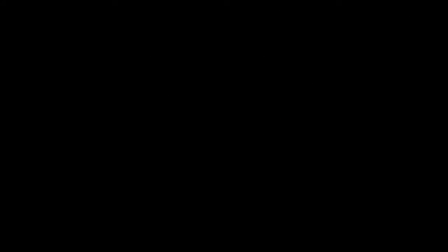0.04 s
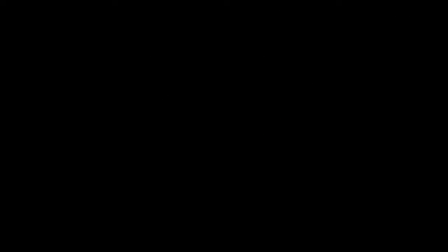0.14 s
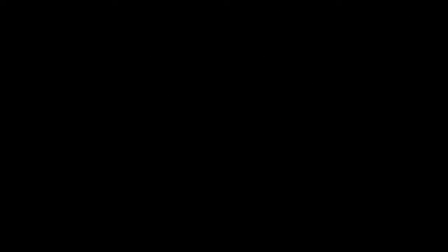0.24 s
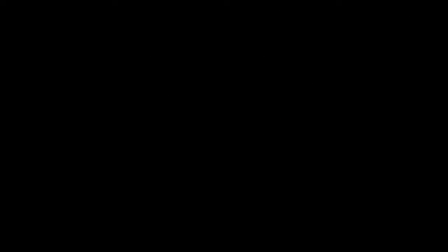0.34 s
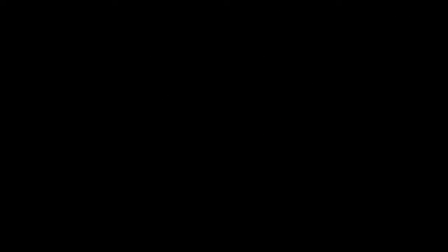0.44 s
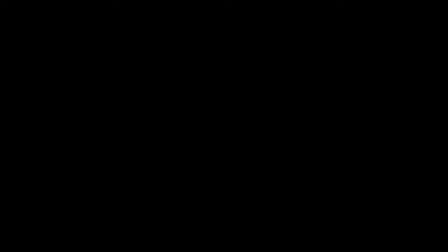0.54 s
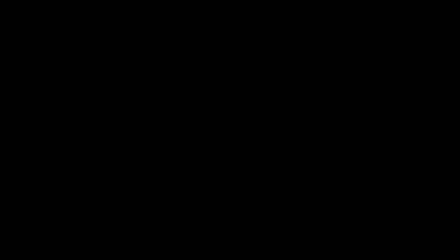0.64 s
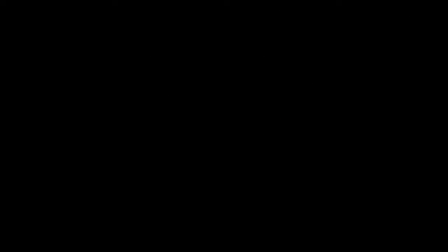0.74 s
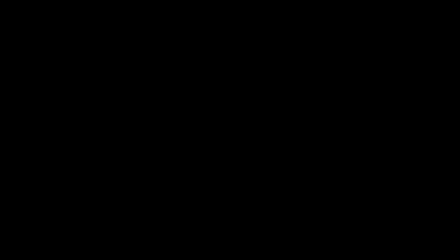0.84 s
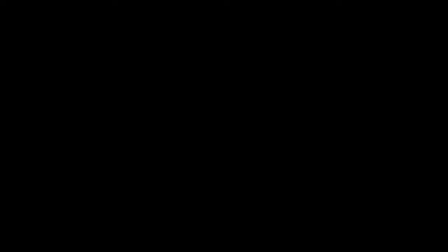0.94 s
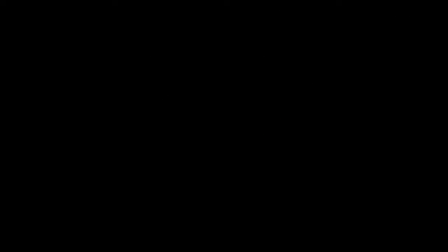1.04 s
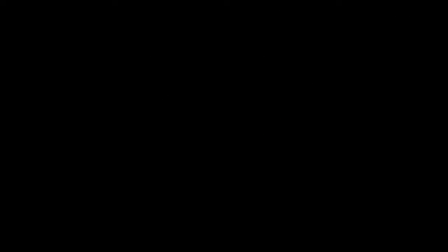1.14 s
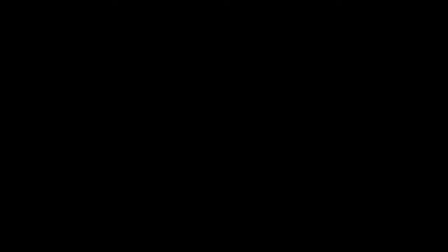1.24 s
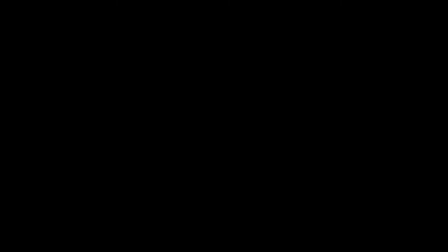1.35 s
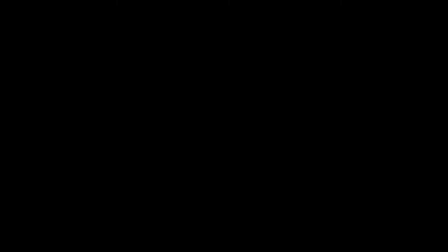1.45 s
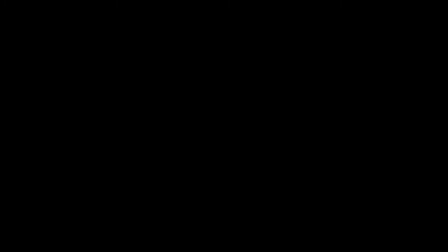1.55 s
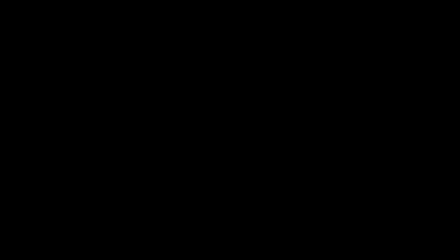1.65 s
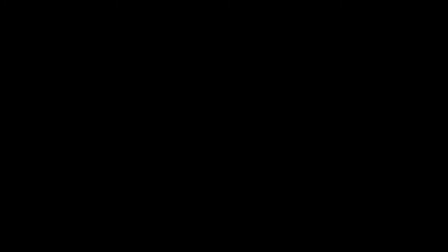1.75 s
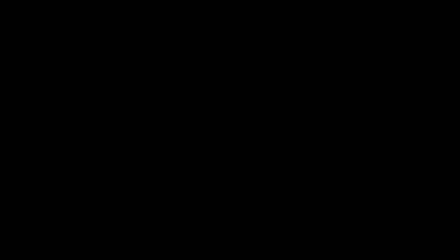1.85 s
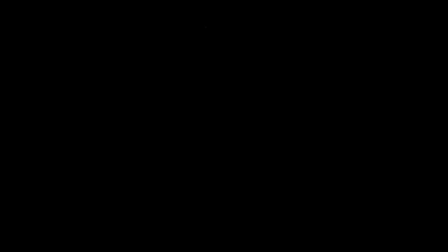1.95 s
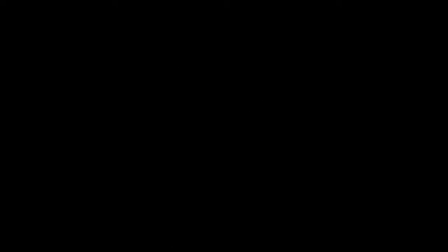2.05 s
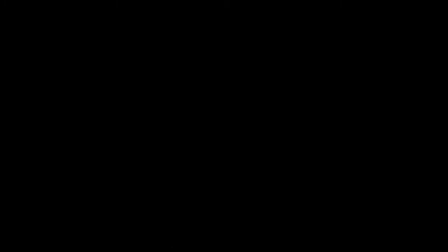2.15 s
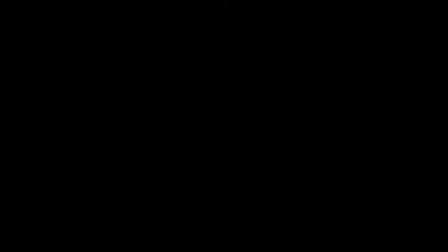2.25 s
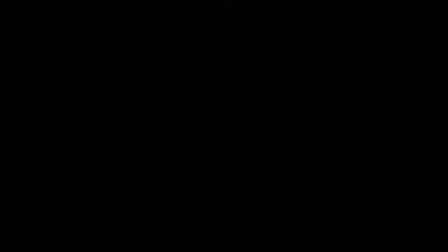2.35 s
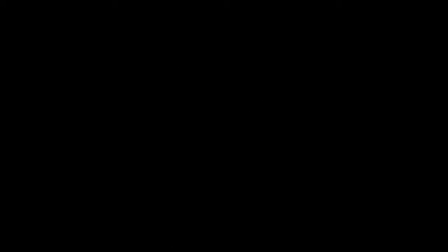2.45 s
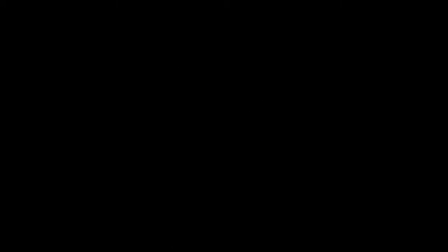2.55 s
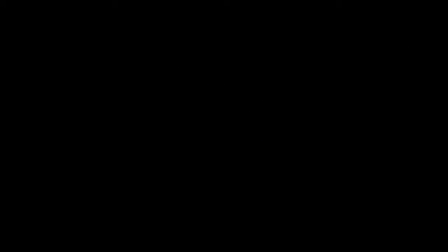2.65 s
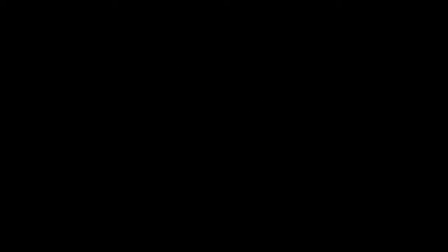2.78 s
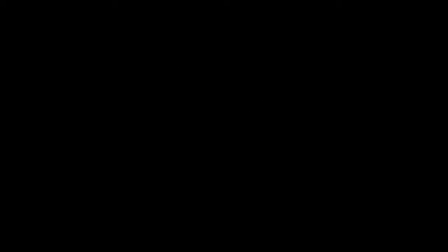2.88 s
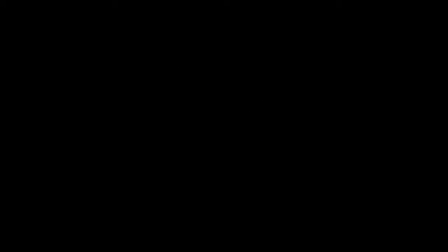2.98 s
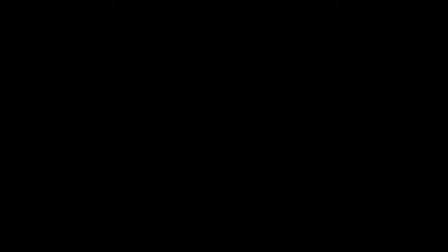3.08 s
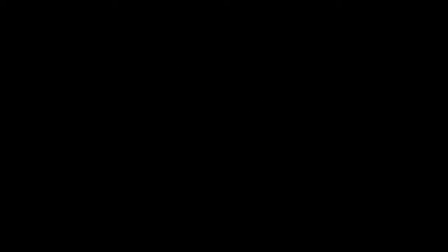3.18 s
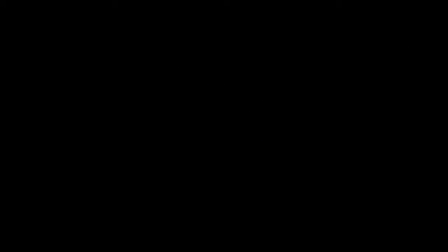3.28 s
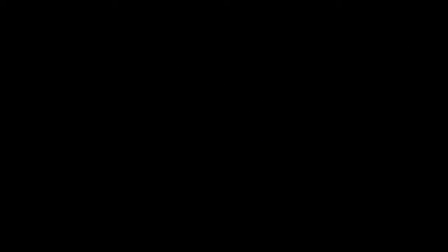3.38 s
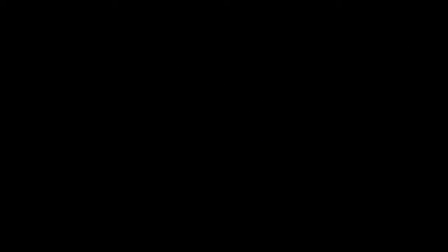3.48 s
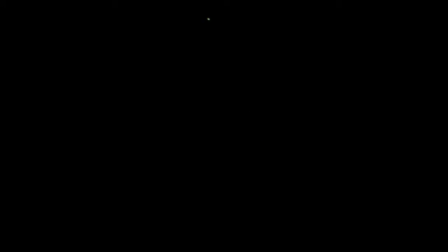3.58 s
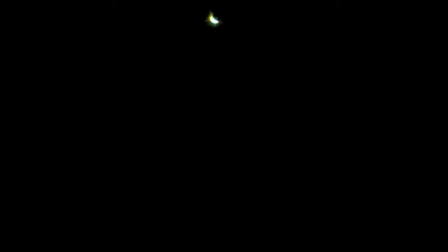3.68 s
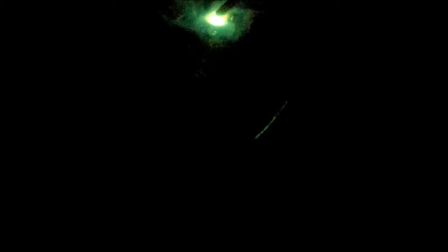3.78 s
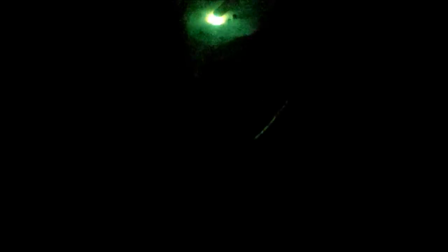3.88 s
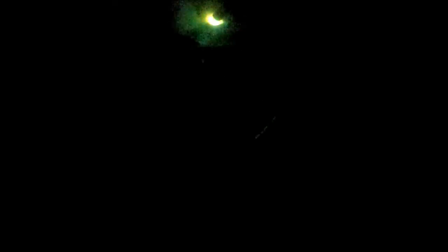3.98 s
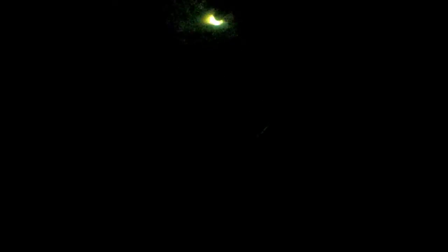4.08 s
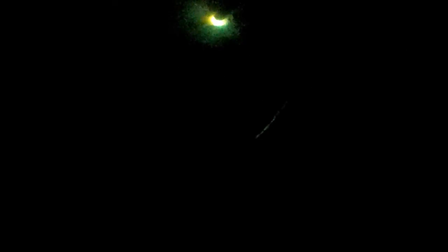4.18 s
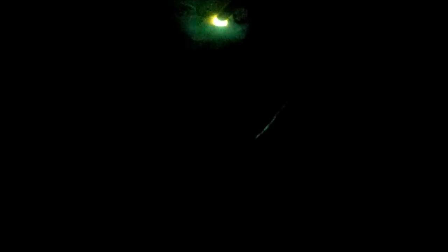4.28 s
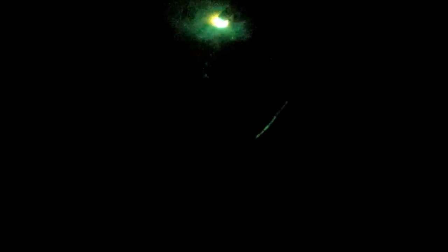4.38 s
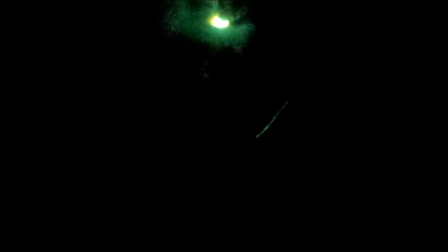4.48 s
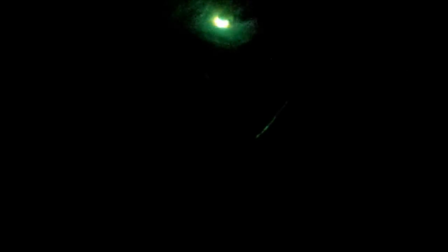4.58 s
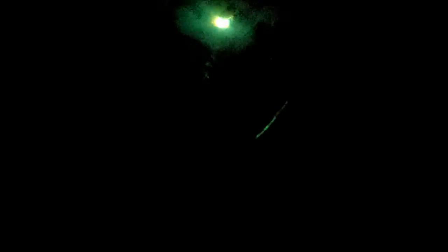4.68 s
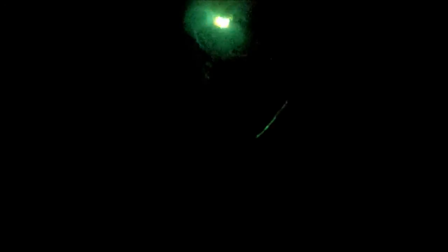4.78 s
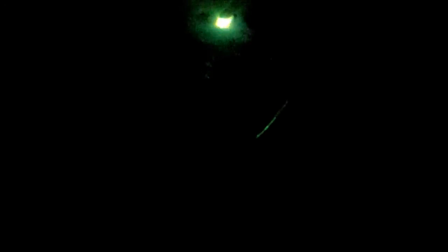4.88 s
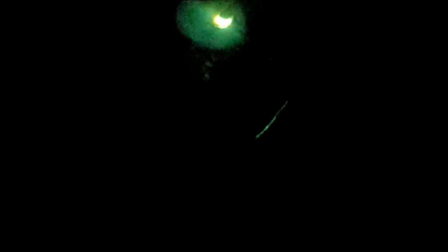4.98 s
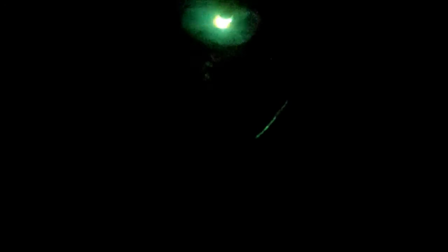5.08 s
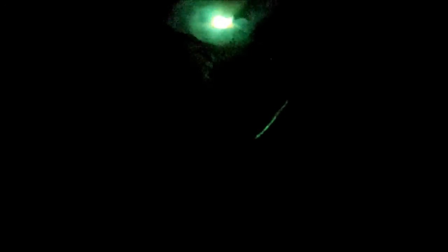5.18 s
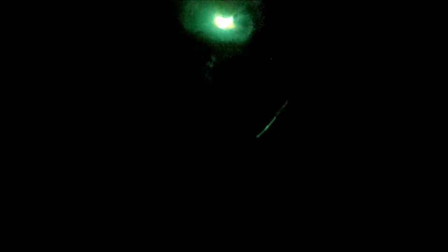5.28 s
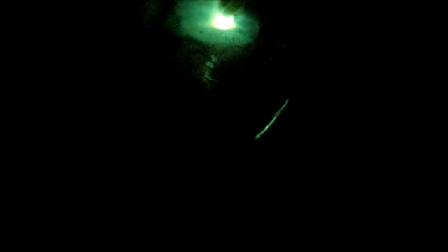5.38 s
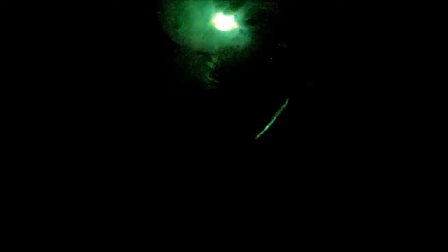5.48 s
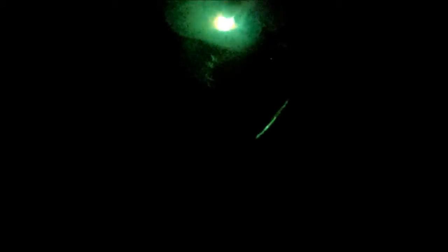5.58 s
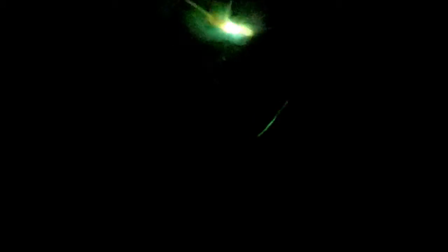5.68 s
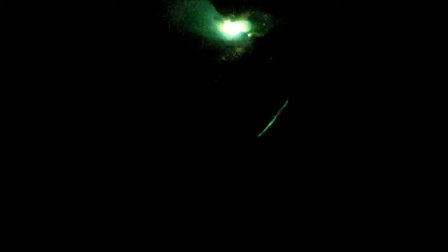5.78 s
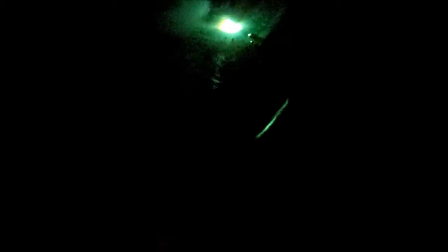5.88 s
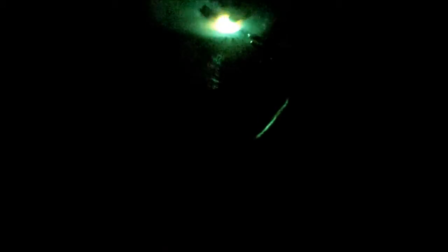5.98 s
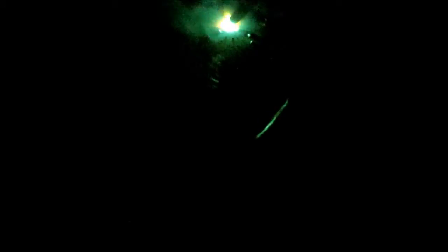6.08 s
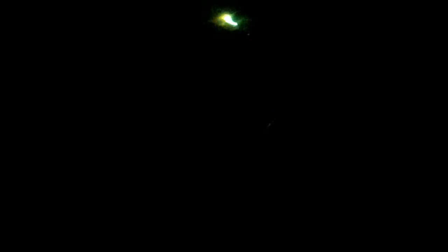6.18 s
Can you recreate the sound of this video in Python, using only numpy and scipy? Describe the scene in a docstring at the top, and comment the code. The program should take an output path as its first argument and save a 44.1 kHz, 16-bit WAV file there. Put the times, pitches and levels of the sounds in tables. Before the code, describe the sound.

Stick welding heard from close by in a slightly reverberant workshop. At first there is only the low, airy hum of the welder's fan, broken by a light knock and a short sputter as the rod fails to strike. A little past halfway the arc ignites, much louder than the hum, and sizzles and crackles to the end while drops of molten metal burst with sharp pops.

```python
"""Stick welding in a workshop. The fan of the welding machine hums from the start.
The rod knocks and scratches on the work and spits briefly, with a dull puff of gas.
Then the arc catches and burns to the end: a low roar of gas, a crackle of countless sparks,
and a sharp pop whenever a bridge of molten metal bursts. Fixed resonances near the microphone
colour the sparks and pops, and the walls answer with a short reverberation."""
import sys
import numpy as np
from scipy import signal
from scipy.fft import rfft, irfft
from scipy.io import wavfile
from scipy.ndimage import uniform_filter1d

SR = 44100
rng = np.random.default_rng(int(sys.argv[2]) if len(sys.argv) > 2 else 0)


def bounce(signal):
    """Save signal as a 16-bit WAV file at the path given by the first command-line argument."""
    frames = np.transpose(np.atleast_2d(signal))
    limited = np.clip(frames, -1, 1)
    pcm = np.round(limited * 32767).astype(np.int16)
    wavfile.write(sys.argv[1], SR, pcm)


N = 274743
TIME = np.arange(N) / SR

# Broad spectrum of a spark. Each row: frequency in Hz, relative level in dB.
SPARK_SPECTRUM = [(40, -45.5), (110, -25.5), (250, -25), (650, -20.5), (900, -33), (1400, -23), (2300, -27),
                  (3600, -37), (4200, -46), (5400, -32.5), (8000, -40.5), (12000, -33), (15200, -44),
                  (17000, -56.5)]
# Fixed resonances near the microphone, likely camera housing or helmet, that colour the sparks
# and pops. Each row: frequency in Hz, width in Hz, relative level in dB.
NEAR_MODES = [(427, 57, -7.3), (1700, 105, -13.0), (1880, 48, -15.9), (2543, 50, -14.6), (2741, 81, -10.9),
              (3102, 110, -12.7), (3681, 338, -23.1), (4412, 90, -20.1), (4586, 37, -17.1),
              (4923, 92, -19.0), (5979, 94, -12.5), (6356, 148, -24.0), (6921, 115, -22.6),
              (7372, 122, -19.2), (7920, 172, -25.1), (8082, 116, -22.1), (8479, 42, -25.9),
              (8745, 60, -27.3), (9629, 112, -25.4), (9954, 110, -26.0), (10323, 80, -25.6),
              (11000, 155, -27.6), (12161, 58, -26.9), (12479, 87, -25.6), (12859, 73, -24.2),
              (13695, 91, -23.9), (13964, 262, -27.7), (15094, 229, -29.9)]
# How hard the arc burns, from ignition on. Each row: time in seconds, relative level in dB.
BURN = [(3.711, 1.5), (3.84, -3), (4.08, 4.5), (4.2, -1), (4.255, -4.5), (4.3, 1.5), (4.42, -.5),
        (5.2, -1.15), (5.48, 0.4), (5.75, -2.5), (6.12, 2.5), (6.23, -4)]
# The arc brightens, dulls as it settles, and brightens again.
# Each row: time in seconds, spectral tilt in dB per octave.
BRIGHTNESS = [(3.75, -0.1), (4.3, 2), (4.6, 2.5), (5.62, -2.66), (6.2, .3)]
# Drops of metal bridge the gap and burst. Each row: time in seconds, relative strength in dB,
# base decay time in seconds, change in the arc's level just before the burst in dB.
DROPS = [(3.72, -11, 0.0023, 0), (3.7316, -12, 0.0017, -7), (3.7702, -10.5, .0016, 3),
         (3.8763, -4.5, 0.00069, 5.5), (3.9942, -9.5, 0.0014, -24), (4.0544, -4.5, 0.00092, -4),
         (4.1164, -14.5, 0.001, -9), (4.1884, -10.5, .0012, 0), (4.3089, -17, 0.00069, 2),
         (4.3599, -12.5, 0.0013, 1), (4.5048, -15.5, 0.0015, 1), (4.6568, -14, .0009, 3),
         (4.8492, -19, 0.00092, -3.5), (4.926, -18.5, .0012, -2.5), (4.9839, -3, 0.0018, -1),
         (5.2295, -13, 0.0017, -1), (5.325, -6.5, 0.0013, -4), (5.344, -8, 0.0022, 4),
         (5.4903, -13.5, 0.0031, 2.5), (5.5074, -15, 0.0018, 2.5), (5.5828, -13, 0.0025, -3),
         (5.62, -14.5, 0.0019, 2), (5.6848, -16.5, .0011, 1.5), (5.7082, -11.5, 0.0011, -2),
         (5.7896, -16.5, 0.0015, 1), (6.1071, -7.5, 0.00073, 1), (6.1114, -10.5, .00097, -1),
         (6.163, -14, 0.0028, -2), (6.2259, -12.5, .0014, -8)]


def gain_of(db):
    """Amplitude ratio of a level in decibels."""
    return 10 ** (np.asarray(db) / 20)


def unit_rms(x):
    """Normalisation to an rms of 1."""
    return x / np.sqrt(np.mean(x ** 2) + 1e-20)


def at(curve, s):
    """Linear interpolation of a control curve in time."""
    return np.interp(s, *np.transpose(curve))


def at_frequency(points, hz):
    """Interpolation on a logarithmic frequency axis."""
    f, value = np.transpose(points)
    return np.interp(np.log(hz + 1), np.log(f + 1), value)


def add(mix, s, sound):
    """Superposition: a sound joins the mix at s seconds."""
    part = mix[round(s * SR):][:len(sound)]
    part += sound[:len(part)]


def wander(rate_hz):
    """Slow random modulation: low-passed noise of rms 1."""
    hz = np.fft.rfftfreq(N, 1 / SR)
    return unit_rms(irfft(rfft(rng.standard_normal(N)) / (1 + (hz / rate_hz) ** 4), N))


def band(x, low_hz, high_hz):
    """Complementary band-pass filter: neighbouring bands add up flat."""
    hz = np.fft.rfftfreq(len(x), 1 / SR)
    passband = 1 / (1 + (hz / high_hz) ** 8) - 1 / (1 + (hz / low_hz) ** 8)
    return irfft(rfft(x) * passband, len(x))


def ring(spectrum, modes, tilt_db=0, size=8192):
    """Minimum-phase impulse response, of energy 1, of a broad spectrum with resonances on top."""
    hz = abs(np.fft.fftfreq(size, 1 / SR))
    power = gain_of(at_frequency(spectrum, hz)) ** 2
    power += sum((gain_of(db) / (1 + ((hz - f) / width) ** 2)) ** 2 for f, width, db in modes)
    log_gain = np.log(np.sqrt(power) * gain_of(tilt_db * np.log2(hz + 300)))
    response = np.fft.ifft(np.exp(np.conj(signal.hilbert(log_gain)))).real[:size // 2]
    return response / np.linalg.norm(response)


def fan(shaft_hz=92.77, waver=0.0017, air_db=-33.5, throb_db=1.5):
    """Forced resonance: air noise excites the case, under harmonics of the wavering shaft speed."""
    # Broad spectrum of the airflow. Each row: frequency in Hz, relative level in dB.
    air_spectrum = [(20, -42), (42, -31), (52, -33), (66, -30.5), (145, -43.5), (185, -16.5), (400, -26),
                    (560, -46.5), (880, -34), (1020, -44), (2300, -44), (4000, -53), (6000, -60),
                    (15000, -78)]
    # Resonances of the case. Each row: frequency in Hz, width in Hz, relative level in dB.
    case_modes = [(203, 7.8, -12.5), (249.5, 44.6, -15.5), (331.7, 20, -18.5), (437, 31, -15),
                  (463.2, 30, -12), (489, 41, -21), (580, 22, -28), (643, 47, -29.5), (1693, 144, -35.5),
                  (1857, 90, -35), (2532, 88, -38), (2990, 85, -45), (3258, 44, -36.5), (3687, 98, -42.5),
                  (4550, 50, -47), (4880, 70, -50.3), (5720, 66, -55), (5900, 100, -67)]
    # Low hum. Each row: multiple of the shaft speed, level in dB.
    hum_orders = [(4, -37.5), (5, -48), (8, -60)]
    # High whine. Each row: time in seconds, level in dB.
    whine = [(0, -59), (.3, -52), (1.6, -53), (1.85, -58), (2.4, -53), (3.05, -49), (3.6, -53)]
    air = unit_rms(signal.oaconvolve(rng.standard_normal(N), ring(air_spectrum, case_modes))[:N])
    turns = np.cumsum(shaft_hz * (1 + waver * wander(6.3))) / SR
    orders = hum_orders + [(20, at(whine, TIME))]
    tones = sum(gain_of(db + throb_db * wander(11.6)) * np.sin(2 * np.pi * k * turns)
                for k, db in orders)
    return gain_of(air_db) * air + np.sqrt(2) * tones


def burst(rise_s, decay_s, size=1024):
    """Broadband transient of energy 1: the pressure of a small explosion swells and dies away."""
    t = np.arange(1, size + 1) / SR
    envelope = (1 - np.exp(-t / rise_s)) * np.exp(-t / decay_s)
    wave = rng.standard_normal(size) * envelope
    for _ in range(6):
        wave = irfft(np.exp(1j * np.angle(rfft(wave))))  # flatten the spectrum
        wave *= envelope / np.sqrt(abs(uniform_filter1d(wave ** 2, 20)) + 1e-20)  # restore the envelope
    return wave / np.linalg.norm(wave)


def sparks(per_s, spread_db, hiss, decay_s, emphasis=0.9, kinds=32):
    """Shot noise: tiny explosions at random times, each kind stressing its own band, over hiss."""
    strength = gain_of(spread_db * np.minimum(rng.exponential(1, N), 3))
    clicks = strength * rng.choice([-1, 1], N) * (rng.random(N) < per_s / SR)
    kind = rng.integers(0, kinds, N)
    centres_hz = rng.permutation(np.geomspace(1200, 15000, kinds))
    out = np.zeros(N)
    for k, length_s in enumerate(decay_s * np.geomspace(.4, 2.5, kinds)):
        grain = burst(length_s / 2, length_s, size=256)
        grain += emphasis * band(grain, centres_hz[k] / np.sqrt(2), centres_hz[k] * np.sqrt(2))
        out += signal.oaconvolve(clicks * (kind == k), grain)[:N]
    return unit_rms(unit_rms(out) + hiss * rng.standard_normal(N))


def rod_scratches():
    """Impulse excitation: the dragging rod spits runs of sparks that ring the nearby resonances."""
    # Each row: start in seconds, level in dB, length in seconds, tilt in dB per octave.
    scratches = [(1.623, -35.5, 0.009, 0), (1.98, -35.5, 0.024, -2), (2.018, -36, 0.046, 0),
                 (2.051, -25.5, 0.022, -3.2), (2.684, -45.5, 0.0085, -1.5), (3.627, -37, 0.019, 1.5),
                 (3.657, -35, 0.0043, 3), (3.681, -36, 0.0091, 1.5), (3.699, -34, 0.012, 2)]
    grit = sparks(per_s=7700, spread_db=6.5, hiss=0.99, decay_s=0.0002)
    out = np.zeros(N)
    for s, db, length_s, tilt_db in scratches:
        run = unit_rms(grit[round(s * SR):round((s + length_s) * SR)])
        add(out, s, gain_of(db) * signal.fftconvolve(run, ring(SPARK_SPECTRUM, NEAR_MODES, tilt_db)))
    return out


def struck(blows, modes):
    """Free vibration: each blow starts damped sines that swell over their first cycle."""
    t = np.arange(8192) / SR
    ringing = sum(gain_of(db - 60 * t / t60) * np.minimum(hz * t, 1) * np.sin(2 * np.pi * hz * t)
                  for hz, db, t60 in modes)
    out = np.zeros(N)
    for s, db in blows:
        add(out, s, gain_of(db) * ringing)
    return out


def rod_knock():
    """Modal ringing after an impact: the rod's tip knocks on the steel."""
    # Each row: time in seconds, strength in dB.
    knocks = [(1.981, -33.5)]
    # Each row: frequency in Hz, relative level in dB, time to fall 60 dB in seconds.
    rod_modes = [(1436, 1.5, 0.06), (1740, -9, 0.13), (2280, -11, 0.33)]
    return struck(knocks, rod_modes)


def gas_puffs():
    """Heavily damped oscillation: gas puffs with a dull ring as a spark flares and dies."""
    # Each row: time in seconds, strength in dB.
    puffs = [(2.0695, -18), (5.709, -38)]
    # Each row: frequency in Hz, relative level in dB, time to fall 60 dB in seconds.
    puff_modes = [(129, 3.8, 0.049), (256, 2.6, 0.043), (463, 3.7, 0.047)]
    return struck(puffs, puff_modes)


def arc(roar_db=-32.0, crackle_db=-28.5, fizz_db=-37, gust_db=1.5, flutter_db=1.84, bridge_s=0.016):
    """Source and filter: gas noise and sparks follow the burn, coloured by the nearby resonances."""
    burn_db = at(BURN, TIME)
    ignition = np.clip((TIME - BURN[0][0]) / 0.0043 + 1, 0, 1)
    # while a drop bridges the gap, the arc chokes or swells
    bridge_db = sum(db * ((TIME > s - bridge_s) & (TIME < s)) for s, _, _, db in DROPS)
    envelope = ignition * gain_of(bridge_db)
    shower = sparks(per_s=1400, spread_db=0, hiss=0.42, decay_s=0.000353)
    shower = unit_rms(shower * gain_of(flutter_db * wander(54)))
    response = ring(SPARK_SPECTRUM, NEAR_MODES)

    def layer(source, level_db):
        """Resonant filtering of one band, scaled to its level."""
        source = source / np.std(signal.oaconvolve(source, response))
        return signal.oaconvolve(source * envelope * gain_of(level_db), response)[:N]

    gas_db = roar_db + 0.6 * burn_db + gust_db * wander(10.5)
    treble_db = 1.3 * at(BRIGHTNESS, TIME)  # the tilt acts over 1.3 octaves
    roar = layer(band(rng.standard_normal(N), 30, 950), gas_db)
    crackle = layer(band(shower, 950, 7000), crackle_db + burn_db)
    fizz = layer(band(shower, 7000, 18000), fizz_db + burn_db + treble_db)
    return roar + crackle + fizz


def pop(s, db, decay_s, rise_s=0.00061, boost_db=18.5, tilt_db=0.54):
    """Impulse response: a bursting drop rings the nearby resonances; weak ones fade more slowly."""
    strongest_db = max(row[1] for row in DROPS)
    stretch = gain_of(0.169 * (strongest_db - db))
    pressure = burst(rise_s * stretch ** 2, decay_s * stretch)
    response = ring(SPARK_SPECTRUM, NEAR_MODES, tilt_db + at(BRIGHTNESS, s))
    return gain_of(db + boost_db) * signal.fftconvolve(pressure, response)


def bursting_drops(spatter_per_s=12, spatter_db=-20.5, spread_db=3):
    """Superposed transients: big drops burst, with small random spatter as long as the arc burns."""
    out = np.zeros(N)
    for s, db, decay_s, _ in DROPS:
        add(out, s, pop(s, db, decay_s))
    for slot in np.arange(BURN[0][0], N / SR, 1 / spatter_per_s):
        s = slot + rng.random() / spatter_per_s
        db = spatter_db + at(BURN, s) + spread_db * rng.uniform(-1, 1)
        add(out, s, pop(s, db, decay_s=.001))
    return out


def reverberation(weld, blur=6, build_s=0.012):
    """Diffuse field: the workshop's dense reflections die away at a different rate in each band."""
    # Each row: frequency in Hz, reverberation time in seconds.
    room_t60 = [(200, .3), (2000, .5), (6000, .55), (15000, .38)]
    # the walls hear the weld from all sides, so the narrow resonances blur into broad humps
    humps = [(hz, blur * width, db - 10 * np.log10(blur)) for hz, width, db in NEAR_MODES]
    colour = abs(rfft(ring(SPARK_SPECTRUM, humps), SR) / rfft(ring(SPARK_SPECTRUM, NEAR_MODES), SR))
    noise = irfft(rfft(rng.standard_normal(SR)) * colour, SR)
    hz, t, bands = signal.stft(noise, SR, nperseg=256)
    decay = gain_of(-60 * t / at_frequency(room_t60, hz)[:, None])
    tail = signal.istft(bands * decay, SR, nperseg=256)[1]
    tail *= np.clip(np.arange(len(tail)) / SR / build_s, 0, 1)
    return signal.fftconvolve(weld, tail / np.linalg.norm(tail))[:N]


def scene(reverb_db=-11.0):
    """Direct and reverberant sound of the nearby weld add to the hum of the fan."""
    weld = arc() + bursting_drops() + rod_scratches() + rod_knock() + gas_puffs()
    return (weld + gain_of(reverb_db) * reverberation(weld) + fan())[None]


def record(dry, ceiling=.92, cutoff_hz=15400):
    """Soft saturation: the loudest pops overload the microphone; a low-pass then limits the band."""
    saturated = ceiling * np.tanh(dry / ceiling)
    low_pass = signal.firwin(301, cutoff_hz, window=("kaiser", 8), fs=SR)
    return signal.oaconvolve(saturated, low_pass[None], "same")


dry = scene()
out = record(dry)
bounce(out)
```